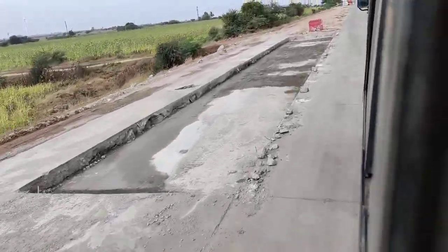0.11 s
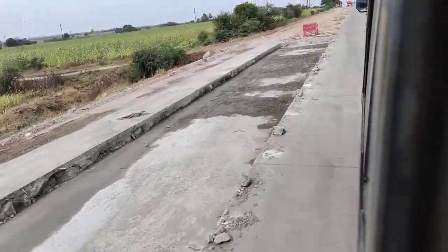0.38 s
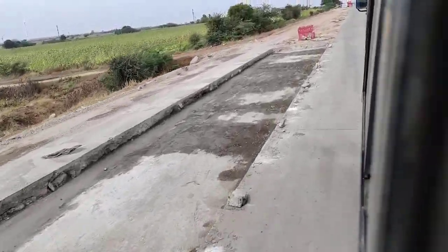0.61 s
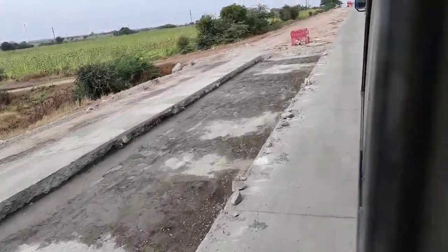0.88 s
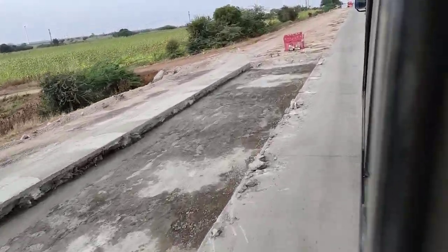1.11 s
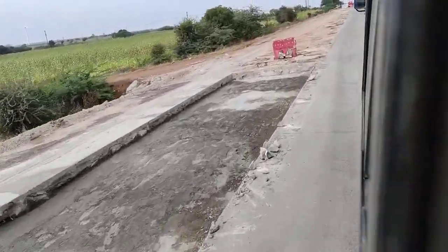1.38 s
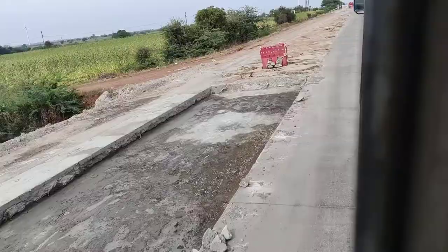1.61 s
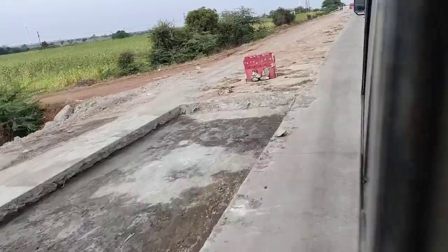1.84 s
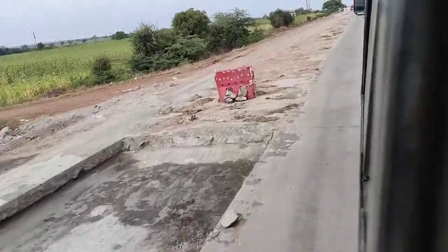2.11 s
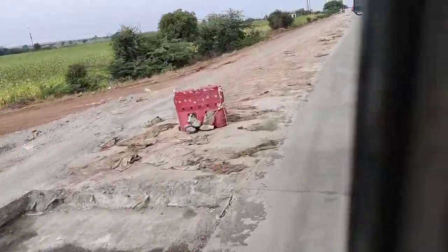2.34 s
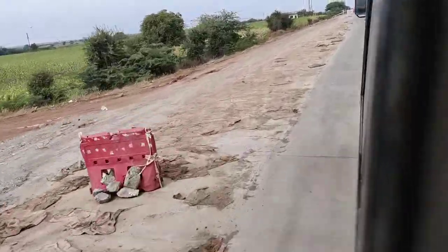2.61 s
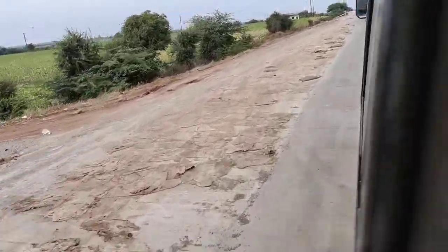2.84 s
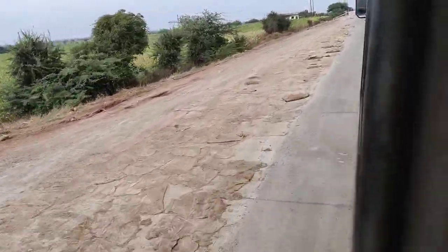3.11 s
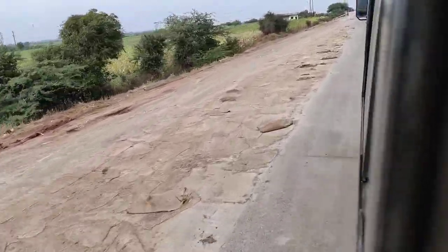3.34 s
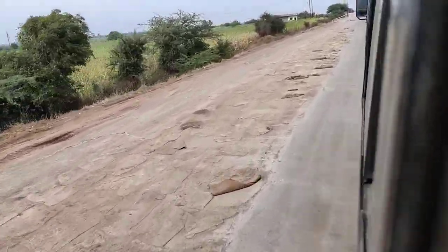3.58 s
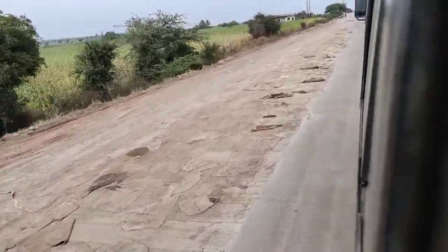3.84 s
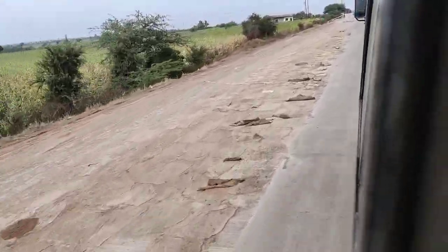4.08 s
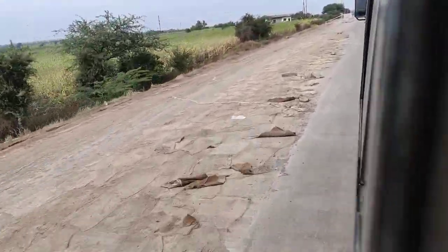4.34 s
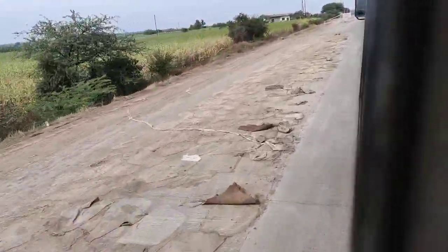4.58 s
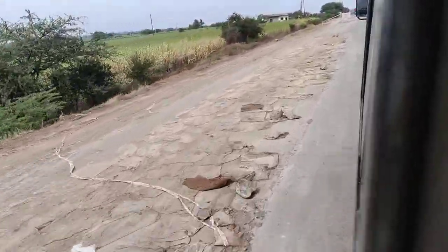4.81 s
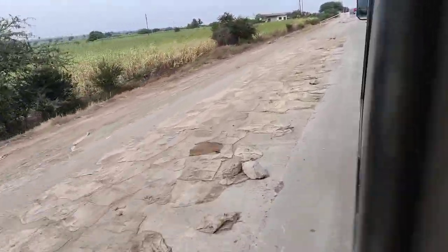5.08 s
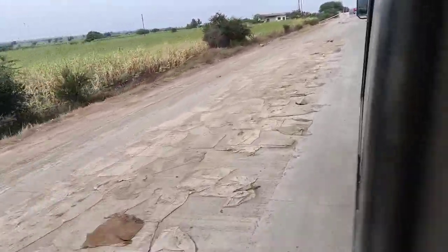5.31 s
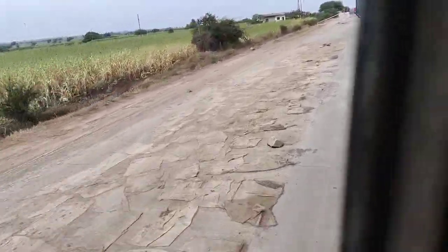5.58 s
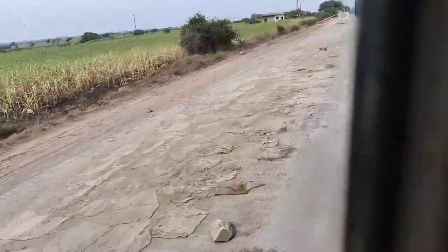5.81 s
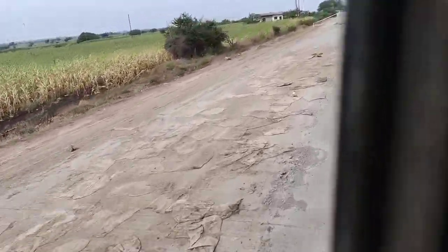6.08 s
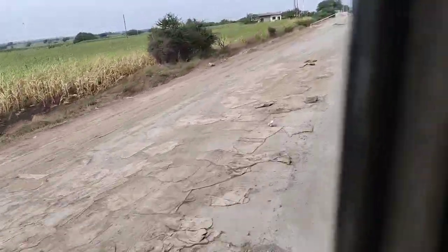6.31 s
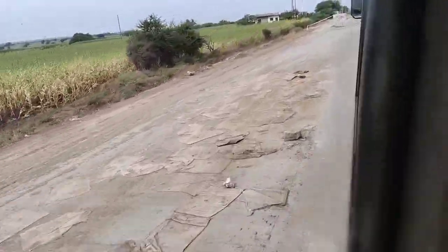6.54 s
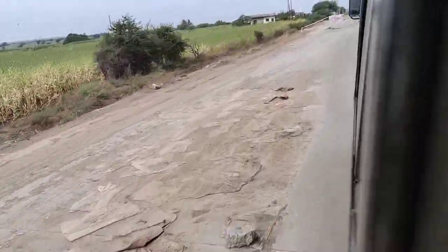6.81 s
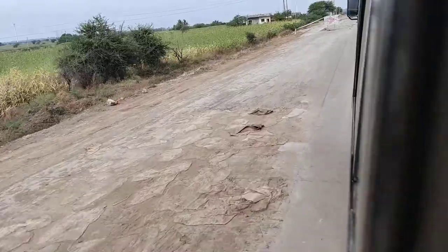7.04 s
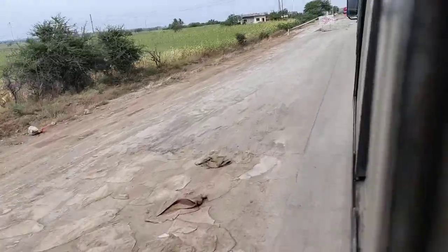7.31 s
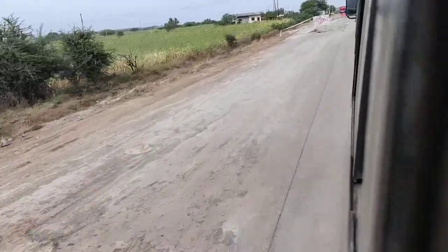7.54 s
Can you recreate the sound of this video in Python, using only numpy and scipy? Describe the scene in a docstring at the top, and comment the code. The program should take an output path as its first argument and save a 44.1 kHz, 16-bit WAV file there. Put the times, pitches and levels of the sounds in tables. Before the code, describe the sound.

Loud wind batters a microphone at the open window of a vehicle moving along a concrete road. Deep thumps, rapid flutter and sharp slaps come irregularly, much stronger on the left; the right is a softer rumbling throb. Underneath, a low engine drone rises slightly, with faint tyre roar, airy hiss and scattered tiny ticks. A thin whistle glides briefly near two seconds.

```python
"""Wind on a two-port microphone

A phone microphone is buffeted at the open window of a vehicle on a concrete road. The left port faces the
stream: random eddies and tabulated blows and slaps make thumps and flutter. The sheltered right port has softer
noise-made rumble and rustle. Both hear two rising sine drones, short ticks and knocks, a faint gliding
whistle, and filtered noise for tyre roar and hiss. A limiter ducks the loudest gusts and their peaks are rounded.
"""
import sys
import numpy as np
from scipy import signal
from scipy.fft import rfft, irfft, next_fast_len
from scipy.io import wavfile
from scipy.ndimage import uniform_filter1d, minimum_filter1d, map_coordinates

SR = 44100
rng = np.random.default_rng(int(sys.argv[2]) if len(sys.argv) > 2 else 0)


def rack_gain(trim_db):
    """Turn a fader trim in dB into the linear factor to multiply a signal by."""
    fader = np.asarray(trim_db, float)
    return 10 ** (fader / 20)


def to_wav(sig):
    """Store sig (one row per channel, or 1-D mono) as 16-bit WAV at the path in sys.argv[1].

    Samples outside -1..1 are clipped; the rate is SR.
    """
    pcm = np.clip(np.atleast_2d(sig), -1, 1) * 32767
    pcm = np.round(pcm).astype(np.int16)
    wavfile.write(sys.argv[1], SR, pcm.T)  # frames by channels


N = 338247  # samples

# heavy sucks of air on the exposed port: (centre time [s], peak level [dB], nominal swing rate [Hz])
BLOW_EVENTS = [(0.019, -1.5, 48.0), (0.067, -5.5, 43.2), (0.403, -3.5, 40.1), (0.685, -1, 57.4),
               (0.692, -6, 150.4), (0.699, -3.5, 138.6), (0.722, -4.0, 150.0), (0.752, -2.5, 73.0),
               (0.994, -3, 69.0), (1.181, -4.0, 73.0), (1.405, -4.0, 40.0), (1.693, -3.0, 49.0),
               (1.761, -1.5, 51.3), (1.845, -3, 93.0), (1.987, -5, 83.3), (2.05, -7.5, 40.0),
               (2.141, -1.5, 61.0), (2.908, -4.0, 60.7), (3.051, -4, 77.6), (3.519, -3, 59.0),
               (3.545, -2.5, 40.0), (3.769, -1.5, 48.7), (3.783, -2.5, 92.2), (4.295, -3, 72.0),
               (4.767, -0.5, 71.7), (4.947, 0.5, 78.3), (4.971, -3, 76.0), (5.062, -3.5, 39.9),
               (5.105, -6, 80.3), (5.304, -3.5, 40.0), (5.492, -6.5, 40.0), (5.517, -5.0, 62.0),
               (5.56, -3.5, 40.2), (5.676, -3, 91.7), (5.892, -4.0, 73.0), (6.034, -3, 61.0),
               (6.093, -7, 49.2), (6.139, -3.5, 42.0), (6.359, -1, 40.3), (6.375, -3, 50.3),
               (6.702, -0.5, 43.8), (6.8, -6, 56.0), (6.987, -1, 60.9), (7.075, -4, 43.6),
               (7.187, -4.5, 70.0), (7.316, -4.5, 66.4), (7.353, -1, 40.3), (7.578, -4.0, 40.0),
               (7.639, -5.0, 85.0)]
# sharp eddies slapping the exposed port:
# (time [s], peak level [dB], nominal swing rate [Hz], brightness [dB])
SLAP_EVENTS = [(.046, -14, 606, 2.5), (.414, -9.5, 503, -4.5), (.488, -12.5, 496, 1), (.58, -16.5, 465, 4),
               (.688, -14, 436, 6), (0.696, -13, 436, -6.5), (.711, -11, 596, 9.5), (.721, -15, 507, 6),
               (.73, -16, 550, 5), (.748, -16, 450, 4), (.757, -12, 423, -0.5), (.789, -18, 595, 6.5),
               (.983, -14, 500, 0), (1.057, -12.5, 454, 2.5), (1.069, -14.5, 500, 2.5),
               (1.18, -11.5, 503, -1), (1.233, -17, 439, 4.5), (1.321, -20, 500, -6), (1.348, -16, 570, 5),
               (1.674, -8.5, 453, -5), (1.696, -10, 417, 2), (1.76, -15.5, 500, 8.5),
               (1.817, -10.5, 420, -1), (1.844, -9.5, 604, 3), (1.881, -10.5, 540, 0.5),
               (1.94, -22, 547, -5), (1.965, -16, 550, -2), (2.007, -16, 547, 2), (2.071, -17, 695, 4),
               (2.175, -14.5, 477, 3.5), (2.198, -21, 417, 3), (2.361, -8.5, 440, -7),
               (2.442, -14, 600, 5.5), (2.526, -19, 547, 1), (2.536, -16, 447, -5), (2.591, -13.5, 550, 0),
               (2.637, -16, 550, -4), (2.674, -11.5, 730, 3.5), (2.692, -14, 496, -1),
               (2.709, -11, 486, -11), (2.74, -11, 441, -7), (2.751, -15, 545, 5),
               (2.766, -15.5, 500, -0.5), (3.021, -10, 540, -2), (3.151, -12, 500, -4.5),
               (3.516, -19, 483, 8), (3.554, -11.5, 523, 4.5), (3.56, -14, 520, -1), (3.566, -16, 477, -3),
               (3.643, -17, 525, 2.5), (3.727, -25.5, 553, 12), (3.769, -17, 520, 10.5),
               (3.781, -20, 520, 8), (4.078, -12.5, 507, -0.5), (4.11, -17.5, 516, 5.5),
               (4.274, -12.5, 470, 1), (4.487, -18, 536, -7.5), (4.5, -17.5, 550, -3), (4.54, -17, 500, 1),
               (4.56, -14.5, 700, -7), (4.577, -16, 690, -1), (4.6, -15.5, 450, 1.5),
               (4.621, -17.5, 600, 0), (4.654, -13, 670, -8), (4.674, -14, 550, 2),
               (4.705, -11.5, 550, -0.5), (4.751, -6, 473, -2), (4.933, -9, 506, 3), (5.069, -8, 590, -3),
               (5.102, -5, 498, -4), (5.304, -13.5, 505, 1.5), (5.522, -8.5, 470, 0.5),
               (5.676, -11.5, 500, 0.5), (5.701, -14.5, 500, 1.5), (5.839, -10, 453, -1),
               (5.867, -8, 460, -6), (5.888, -22, 480, 5), (5.898, -13, 510, -3), (6.04, -10, 500, -1.5),
               (6.05, -15, 517, -7.5), (6.096, -16, 533, 4), (6.18, -12, 440, -4), (6.241, -5, 430, -8),
               (6.302, -15.5, 426, 0), (6.333, -16, 500, -1), (6.418, -14.5, 480, -1),
               (6.432, -10.5, 540, 4), (6.479, -17.5, 500, -2), (6.586, -7.5, 453, -3),
               (6.663, -13.5, 500, 1), (6.68, -19.5, 516, 3), (6.7, -15.5, 525, 11),
               (6.731, -11, 600, -3.5), (6.763, -10, 530, 4.5), (6.791, -18.5, 507, 9),
               (6.84, -17, 550, 4.5), (6.949, -15.5, 500, 3.5), (6.983, -19, 497, 3.5),
               (7.006, -20.5, 510, 1), (7.096, -12.5, 453, 4), (7.191, -5, 533, 4), (7.206, -12.5, 525, -6),
               (7.233, -20, 605, 0), (7.268, -18, 576, 8), (7.338, -14.5, 500, -3), (7.346, -7, 423, 4.5),
               (7.353, -17, 450, -4), (7.579, -16.5, 490, 1), (7.599, -8.5, 487, 0)]
# strength of the eddies at the exposed port: (time [s], relative level [dB])
GUST_STRENGTH = [(0, 0.5), (.37, -3), (.5, 1.5), (.62, -5.5), (.71, 8.5), (.77, -4), (.84, -6), (1.05, 2.5),
                 (1.13, -4), (1.33, 4), (1.45, -4), (1.85, 4), (2.5, -3), (2.7, 1.5), (3.45, -1.5),
                 (3.55, 1), (3.77, 0.5), (4.35, -3), (4.65, 1), (4.82, -2), (5.4, -1), (5.53, 7),
                 (5.62, -1.5), (5.9, 1.5), (6.0, -4), (6.1, 2.5), (6.8, 1.5), (6.9, -1), (7.04, -4),
                 (7.1, 5), (7.16, 1), (7.2, 0.5), (7.33, 1.5), (7.38, -6), (7.43, -4), (7.6, 0)]
# slow swell of the exposed port: (frequency [Hz], relative density [dB])
THUMP_SPECTRUM = [(1, -59), (8, -8), (20, -1), (70, -2), (140, -8.5), (250, -18), (500, -30), (1500, -130)]
# fast turbulence at the exposed port: (frequency [Hz], relative density [dB])
FLUTTER_SPECTRUM = [(40, -59.5), (120, 0.5), (250, 2.5), (450, -5), (800, -15.5), (1300, -30), (2200, -49),
                    (4000, -71.5), (9000, -95.5), (15000, -120)]
# throb of the window gap at the sheltered port: (time [s], rumble level [dB])
GAP_THROB = [(0, -15.5), (.5, -10.5), (.95, -15), (1.25, -11.5), (1.5, -16), (1.8, -19), (2.3, -13),
             (2.6, -15.5), (3.25, -9.5), (3.55, -12.5), (4.0, -12), (4.4, -15), (5.3, -13), (5.83, -17),
             (5.9, -8), (6.0, -18), (6.1, -14), (6.55, -17), (6.75, -20), (7.2, -15.5), (7.67, -17)]
# rumble of the window gap: (frequency [Hz], relative density [dB])
RUMBLE_SPECTRUM = [(1, -70.5), (8, -20), (21, 4), (32, -4), (45, -9.5), (80, -9.5), (115, -15), (180, -19),
                   (700, -130)]
# weak turbulence at the sheltered port: (frequency [Hz], relative density [dB])
RUSTLE_SPECTRUM = [(60, -55), (150, 1.5), (250, -10), (400, -16.5), (650, -23.5), (1200, -29), (4000, -130)]
# coming and going of the upper drone, before its trims: (time [s], level [dB])
UPPER_DRONE_LEVEL = [(0, -21), (.35, -21.5), (.48, -30), (.65, -19.5), (.9, -23), (1.2, -18), (1.75, -18.5),
                     (2.0, -29), (2.3, -17.5), (2.7, -18.5), (3.1, -16), (3.35, -19.5), (3.6, -23),
                     (3.9, -29.5), (4.35, -23), (4.7, -21.5), (5.05, -26.5), (5.4, -17.5), (5.6, -26),
                     (5.8, -19.5), (5.95, -27.5), (6.2, -18.5), (6.6, -37), (7.6, -36.5)]
# short ticks and knocks, some of them falling on blows and slaps, before a common trim: (time [s], peak level
# [dB], left over right [dB], knock over click [dB])
TICK_EVENTS = [(.35, -44.5, 1, -4), (.5715, -40, -6, 0), (1.069, -46.5, 4, 0.5), (1.092, -42.5, -8, -6),
               (1.166, -39, -2, -14), (1.7614, -46, 9.5, 2), (1.8423, -39.5, 3.5, 4),
               (3.3994, -36.5, -1, 4), (3.519, -46.5, 11.5, -1), (3.545, -50, 9, 2), (3.6945, -41, 8.5, -5),
               (3.728, -43, 11, 8.5), (3.754, -41.5, 4.5, -11), (3.764, -42, 10, 2),
               (3.7684, -40.5, 10, 8.5), (3.7814, -41.5, 12, 3), (3.9245, -39, 2, 4.5), (4.071, -42, -3, 3),
               (4.1111, -36.5, -3, 9), (4.138, -37, 5.5, 0.5), (4.2742, -40.5, 1, 5), (4.7641, -44.5, 4, 4),
               (5.1038, -43.5, 5, 6), (5.9703, -36, 2.5, -1), (5.9823, -33, 3.5, -4), (6.333, -44, 2, 4),
               (6.4323, -47, 8, 3), (7.1931, -48.5, 7, 5), (7.3505, -38.5, 14, 2), (7.4071, -48.5, 5, -1)]
# bright clicks: (frequency [Hz], relative density [dB])
CLICK_SPECTRUM = [(2500, -41), (4300, 1), (6500, -1), (9000, -9.5), (13000, -20.5), (16000, -46.5)]
# duller knocks: (frequency [Hz], relative density [dB])
KNOCK_SPECTRUM = [(700, -38), (1500, -5), (2500, 1.5), (3500, -7.5), (5000, -25.5), (8000, -60)]
# thin whistle, before the trim of each port: (time [s], frequency [Hz], level [dB])
WHISTLE_GLIDE = [(1.68, 1323, -76), (1.74, 1343, -49), (1.86, 1410, -42), (1.92, 1285, -52),
                 (1.95, 1175, -62), (1.99, 1103, -37), (2.05, 990, -81)]
# air stream past the window, used about its own mean: (time [s], level [dB])
AIR_STREAM = [(0.03, -67.5), (0.25, -63.5), (0.36, -62.5), (0.49, -64), (0.66, -62.5), (0.76, -67.5),
              (0.92, -64.5), (1.05, -66.5), (1.12, -67.5), (1.28, -66), (1.42, -67), (1.78, -65.5),
              (2.3, -65.5), (2.83, -63), (2.98, -63.5), (3.21, -64.5), (3.32, -61.5), (3.55, -64),
              (3.75, -63.5), (3.95, -67), (4.24, -64), (4.37, -65), (4.52, -65), (4.71, -68), (4.98, -63.5),
              (5.09, -67.5), (5.3, -63.5), (5.6, -65.5), (5.83, -64), (5.9, -64), (5.98, -62.5),
              (6.12, -64), (6.42, -66.5), (6.95, -65.5), (7.6, -70)]
# tyre roar: (frequency [Hz], relative density [dB])
ROAR_SPECTRUM = [(250, -39.5), (600, -7), (1300, 3), (1620, 4.5), (1850, -8.5), (2500, -5.5), (3300, -13.5),
                 (4300, -27.5), (8000, -120)]
# air hiss: (frequency [Hz], relative density [dB])
HISS_SPECTRUM = [(2500, -44), (4300, -3.5), (6000, -2.5), (8500, -6), (11000, -15), (13300, -26.5),
                 (16000, -38.5)]
# top band of the hiss: (frequency [Hz], relative density [dB])
FIZZ_SPECTRUM = [(6000, -50.5), (8500, -5), (10500, 0), (13000, -5.5), (16000, -20)]
# effect of the phone's body on road sound at the left port: (frequency [Hz], gain [dB])
LEFT_BODY_RESPONSE = [(600, 7), (1300, -4), (1620, -8.5), (1900, -2), (2600, -4.5), (4000, 3.5), (8000, 2),
                      (13000, 6.5)]


def exposed_wind():
    """Turbulent pressure on a port facing the stream: a faster eddy sucks harder, louder and brighter."""
    gust_db = curves(GUST_STRENGTH)[0] + 0.64 * wobble(12)
    # tanh puts a ceiling on the eddies' speed
    eddies = 1.89 * np.tanh(0.34 * wobble(16) + 0.5 * wobble(55) + 0.49 * wobble(140))
    blows = heavy_blows()
    thump = swell_thump(eddies, gust_db, blows)
    flutter = noise(FLUTTER_SPECTRUM, patchy_db=-1.0)
    edge = unit(np.gradient(flutter))  # the steep flanks of the same swings
    suction = np.clip(-3.3 * (thump + blows), -2, 2)
    steady = suction_flutter(eddies, gust_db, suction, flutter, edge)
    slaps, parted = eddy_slaps(edge)
    return blows + parted * (thump + steady) + slaps


def heavy_blows():
    """Suction pulses: windowed swings of nearly fixed phase, so each has a trough at its centre."""
    cycles = 1.6
    centre_s, level_db, hz = np.transpose(BLOW_EVENTS)
    return swings(centre_s - cycles / 2 / hz, level_db, hz, cycles, scatter=0.05)


def swell_thump(eddies, gust_db, blows):
    """Low-frequency turbulence: noise modulated by eddy speed, its troughs deeper than its crests."""
    mean_db, db_per_gust_db = -10.5, 0.62
    modulation_db = 0.8 * wobble(8) + 2.0 * wobble(25) + 1.33 * eddies
    swell = unit(rack_gain(modulation_db) * noise(THUMP_SPECTRUM, patchy_db=0.7))
    swell = swell - 0.08 * (swell ** 2 - uniform_filter1d(swell ** 2, SR // 20))
    # a blow takes the place of the swell
    pushed = np.clip(1.3 * uniform_filter1d(np.abs(blows), SR // 60), 0, .8)
    return (1 - pushed) * rack_gain(mean_db + db_per_gust_db * gust_db) * swell


def suction_flutter(eddies, gust_db, suction, flutter, edge):
    """Modulated turbulence: suction and eddy speed raise a mixture of noise, its gradient and short flaps."""
    mean_db, db_per_suction, flaps_per_s = -20, 2, 130
    when, size, pitch = rng.random((round(flaps_per_s * N / SR), 3)).T
    flaps = swings(when * N / SR, 11 * size, 170 * np.exp(1.4 * pitch), cycles=1.53)
    body = rack_gain(3.58 * eddies) * flutter
    treble = 0.18 * rack_gain(4.5 * eddies + 0.9 * gust_db) * edge  # strong gusts carry more treble
    flapping = 0.48 * rack_gain(1.7 * eddies) * unit(flaps)
    mixture = rack_gain(db_per_suction * suction) * (body + treble + flapping)
    return rack_gain(mean_db + gust_db) * unit(mixture)


def eddy_slaps(edge):
    """Impulsive loading: a slap is swings with a short higher-pitched crack inside and a burst of treble."""
    s, db, hz, bright_db = np.transpose(SLAP_EVENTS)
    crisp = bursts(np.transpose([s, db + bright_db]), rise_s=0.0035, t60_s=0.022)
    crack = swings(s, db + bright_db / 2 - 15.5, 2.4 * hz, cycles=1.4)
    thud = swings(s - .0015, db, hz, cycles=2.26)
    # gain by which a slap sweeps swell and flutter aside
    presence = bursts(np.transpose([s - .004, db]), rise_s=0.0024, t60_s=0.032)
    parted = 1 - np.clip(1.3 * presence, 0, .6)
    return crack + thud + rack_gain(-6.0) * crisp * edge, parted


def sheltered_wind(stream_db):
    """Sheltered flow: modulated low noise for the throb of the window gap, and a weaker rustle in puffs."""
    rumble_db, = curves(GAP_THROB)
    throb_db = 1.9 * wobble(7.4) + 1.2 * wobble(3)
    rumble = rack_gain(rumble_db) * unit(rack_gain(throb_db) * noise(RUMBLE_SPECTRUM, patchy_db=1.0))
    puffs_db = 1.5 * wobble(18) + 1.8 * wobble(60)
    rustle = unit(rack_gain(puffs_db) * noise(RUSTLE_SPECTRUM, patchy_db=-0.5))
    return rumble + rack_gain(-28.5 + stream_db) * rustle


def drones():
    """Phase integration: two unsteady tones rise as the vehicle gains speed, with octaves, louder at right."""
    t = np.arange(N) / SR
    upper_db, = curves(UPPER_DRONE_LEVEL)
    upper_hz = 140.7 + 1.9 * t + 2.61 * wobble(14) + .4 * wobble(3)
    firing_hz = 59.8 + .92 * t + 1.292 * wobble(8)
    firing_db = -30.5 + 1.16 * t + 3.0 * wobble(6.5)  # the engine pulls harder
    octave_db = -30.5 + 4.0 * wobble(9)
    upper = 2 * np.pi * np.cumsum(upper_hz) / SR
    firing = 2 * np.pi * np.cumsum(firing_hz) / SR
    hum = rack_gain(upper_db - .5 + 2.6 * wobble(18)) * (np.sin(upper) + rack_gain(-23) * np.sin(2 * upper))
    throb = rack_gain(firing_db) * np.sin(firing) + rack_gain(octave_db) * np.sin(2 * firing)
    hum, throb = np.sqrt(2) * hum, np.sqrt(2) * throb  # a unit sine gets rms 1
    return np.array([rack_gain(-7.5) * hum + rack_gain(-7.0) * throb, hum + throb])


def ticks_and_knocks():
    """Exponentially damped noise: short bright clicks and duller, longer knocks, with fainter ones at random."""
    faint_per_s, faintest_db = 2, -48
    when, size, pan = rng.random((round(faint_per_s * N / SR), 3)).T
    faint = zip(when * (N - 1) / SR, faintest_db + 4 * size, 6 * pan - 2, 6 * size - 6)
    ticks = [*TICK_EVENTS, *faint]

    def envelopes(share, t60_s):
        """Panned decays at the left and right ports; share scales the knock's level over the click in dB."""
        ports = []
        for side in (1, -1):
            rows = [(s, db + side * pan_db / 2 + share * knock_db) for s, db, pan_db, knock_db in ticks]
            ports.append(bursts(rows, rise_s=0.0001, t60_s=t60_s))
        return np.array(ports)

    clicks = envelopes(0, t60_s=0.008) * both_ports(CLICK_SPECTRUM, alike=0.17, patchy_db=None)
    knocks = envelopes(0.98, t60_s=0.043) * both_ports(KNOCK_SPECTRUM, alike=0.23, patchy_db=None)
    return rack_gain(-7.0) * (clicks + knocks)


def whistle():
    """A gliding sinusoid: its integrated frequency climbs a little, then falls."""
    hz, db = curves(WHISTLE_GLIDE)
    port_db = [[-4], [.5]]
    return rack_gain(db) * np.sin(2 * np.pi * np.cumsum(hz) / SR) * rack_gain(port_db)


def road(stream_db):
    """Broadband noise: tyre roar and air hiss swell in short surges; the top band has its own random level."""
    surge_db = 0.22 * wobble(17) + 0.52 * wobble(25)
    roar_db = -40.5 + 0.83 * stream_db + 1.4 * surge_db
    hiss_db = -62.5 + stream_db + surge_db + 1.7 * wobble(28)
    fizz_db = -75.5 + stream_db + 1.8 * wobble(8) + 4.2 * wobble(28)
    roar = rack_gain(roar_db) * both_ports(ROAR_SPECTRUM, alike=0.37, patchy_db=2.0)
    hiss = rack_gain(hiss_db) * both_ports(HISS_SPECTRUM, alike=0.11, patchy_db=1.0)
    fizz = rack_gain(fizz_db) * both_ports(FIZZ_SPECTRUM, alike=0.55, patchy_db=None)
    left, right = roar + hiss + fizz
    return np.array([coloured(left, LEFT_BODY_RESPONSE), right])


def swings(s, db, hz, cycles, scatter=1):
    """Passing vortices: windowed pressure swings that speed up; scatter [cycles] spreads their phase."""
    t = np.arange(SR // 20) / SR
    turn = hz[:, None] * t
    window = np.sin(np.pi * np.clip(turn / cycles, 0, 1)) ** 2
    phase = turn * (0.78 + 0.14 * turn) + scatter * rng.random((len(s), 1))
    grain = window * np.sin(2 * np.pi * phase)
    where = np.round(s * SR).astype(int)[:, None] + np.arange(len(t))
    return np.bincount(where.ravel(), (rack_gain(db)[:, None] * grain).ravel(), N + SR)[:N]


def bursts(rows, rise_s, t60_s):
    """Exponential decay: an envelope with one quick rise and fall per (time [s], level [dB]) row."""
    marks, t = np.zeros(N), np.arange(SR // 10) / SR
    for s, db in rows:
        marks[round(s * SR)] = rack_gain(db)
    shape = (1 - np.exp(-t / rise_s)) * np.exp(-np.log(1000) * t / t60_s)
    return signal.fftconvolve(marks, shape / shape.max())[:N]


def both_ports(spectrum, alike, patchy_db):
    """Partial coherence: a shared part reaches the right port later; the rest is each port's own."""
    shared, left, right = (noise(spectrum, patchy_db) for _ in range(3))
    common = np.array([shared, np.roll(shared, SR // 4200)])  # about a quarter millisecond
    return np.sqrt(alike) * common + np.sqrt(1 - alike) * np.array([left, right])


def noise(spectrum, patchy_db):
    if patchy_db is None:
        return unit(coloured(rng.standard_normal(N), spectrum))
    z = signal.stft(rng.standard_normal(N + 512), nperseg=512)[2]
    field = uniform_filter1d(rng.standard_normal(z.shape), size=5, axis=0)  # across frequency
    field = uniform_filter1d(field, size=8, axis=1)  # across time
    patchy = signal.istft(z * rack_gain(patchy_db * unit(field)), nperseg=512)[1]
    return unit(coloured(patchy, spectrum))


def coloured(x, spectrum):
    """Linear filtering: x through a (frequency [Hz], gain [dB]) response."""
    size = next_fast_len(N + 8192)
    gain = rack_gain(along(spectrum, np.fft.rfftfreq(size, 1 / SR)))
    return irfft(rfft(x, size) * gain, size)[:N]


def along(points, hz):
    """Logarithmic interpolation of (frequency [Hz], value) points."""
    f, v = np.transpose(points)
    return np.interp(np.log(hz + 1), np.log(f + 1), v)


def curves(rows):
    """Linear interpolation in time: one value per sample for each column after the time."""
    s, *cols = np.transpose(rows)
    return [np.interp(np.arange(N) / SR, s, c) for c in cols]


def swing_db(rows):
    """Relative level: a level curve about its own mean."""
    db, = curves(rows)
    return db - db.mean()


def wobble(rate):
    """Slow random modulation: a smooth curve through random knots, rate [knots/s]."""
    knots = rng.standard_normal(int(N * rate / SR) + 4)
    return map_coordinates(knots, [np.arange(N) * rate / SR])


def unit(x):
    """Normalisation to rms 1."""
    return x / np.sqrt(np.mean(x ** 2))


def scene():
    """Superposition: wind is separate at each port; road, drones, whistle and ticks reach both."""
    stream_db = swing_db(AIR_STREAM) + .3 * wobble(9)
    wind = np.array([exposed_wind(), sheltered_wind(stream_db)])
    return wind + drones() + ticks_and_knocks() + whistle() + road(stream_db)


def limited(x):
    """Gain reduction: one gain for both ports drops just after the tallest gusts and creeps back."""
    threshold, hold_s, release_s = 1.15, 0.029, 0.045
    need = np.minimum(1, threshold / (np.abs(x).max(0) + 1e-9))
    hold = round(hold_s * SR)
    # the filter origins make both windows look back in time
    held = minimum_filter1d(need, hold, origin=(hold - 1) // 2)
    quick = uniform_filter1d(held, hold // 2, origin=(hold // 2 - 1) // 2)
    keep = np.exp(-1 / (release_s * SR))
    slow = 1 - signal.lfilter([1 - keep], [1, -keep], 1 - quick)
    return x * np.minimum(quick, slow)


def top_cut(x):
    """Nothing passes above the cut-off."""
    return signal.sosfilt(signal.butter(12, 13700, fs=SR, output="sos"), x)


def record(dry):
    """Amplitude saturation: after a limiter, the input stage rounds off the tallest swings."""
    dry = limited(dry)
    top, hardness = .89, 7  # full-scale fraction, exponent of the knee
    rounded = dry / (1 + np.abs(dry / top) ** hardness) ** (1 / hardness)
    return top_cut(rounded)


dry = scene()
out = record(dry)
to_wav(out)
```